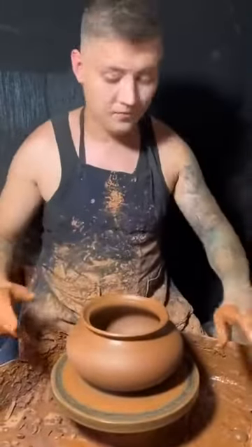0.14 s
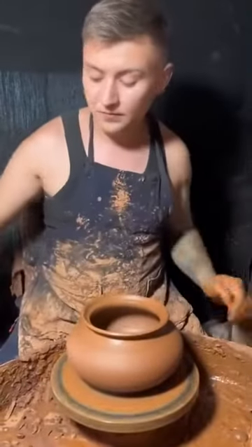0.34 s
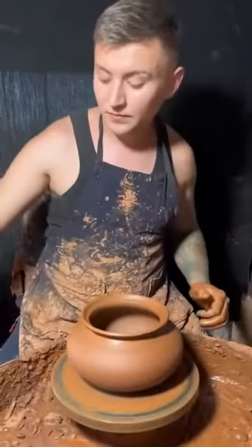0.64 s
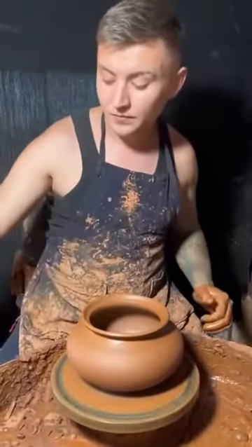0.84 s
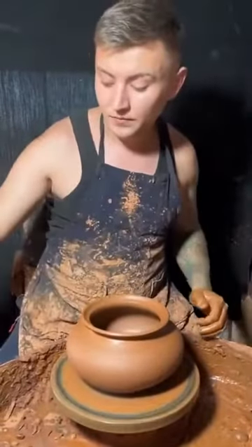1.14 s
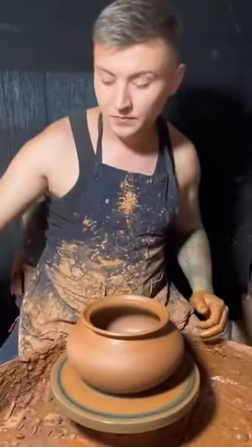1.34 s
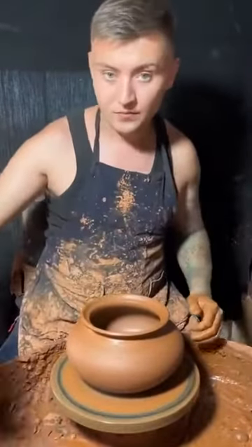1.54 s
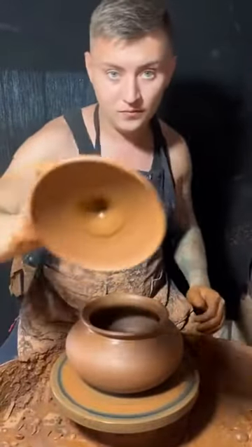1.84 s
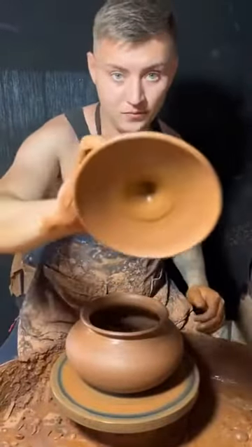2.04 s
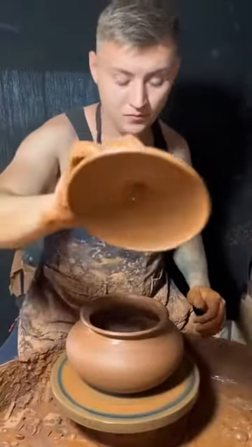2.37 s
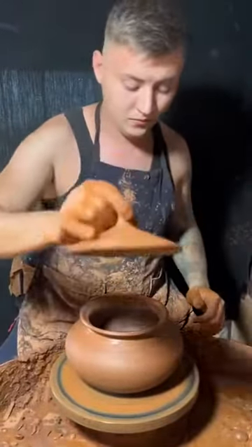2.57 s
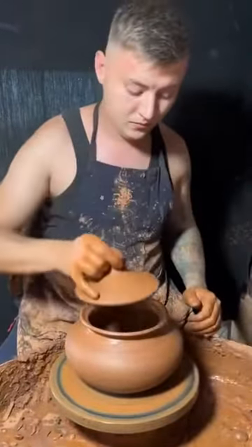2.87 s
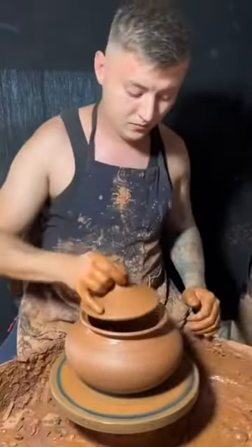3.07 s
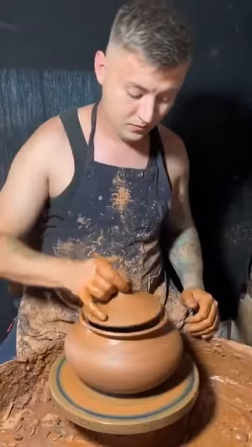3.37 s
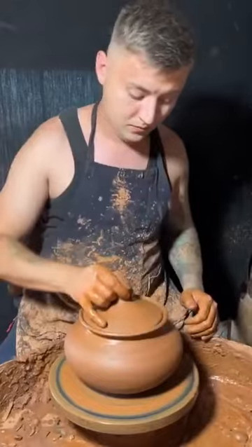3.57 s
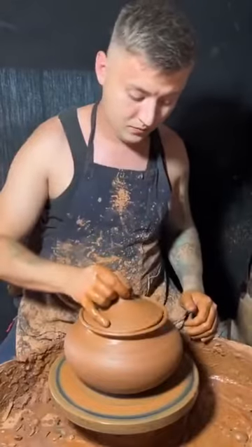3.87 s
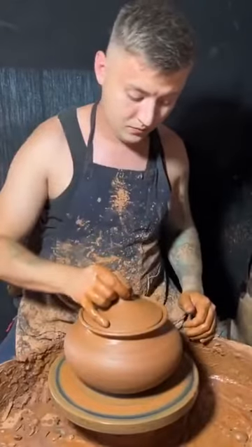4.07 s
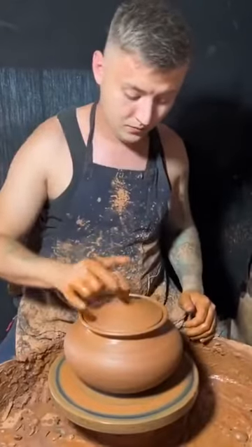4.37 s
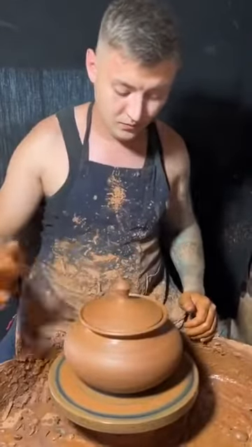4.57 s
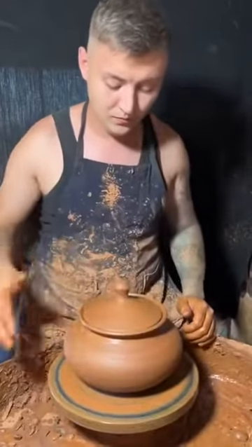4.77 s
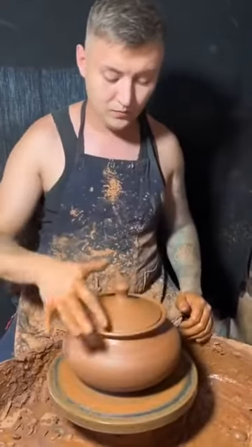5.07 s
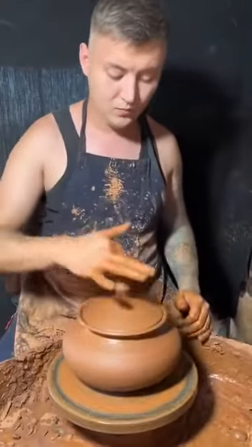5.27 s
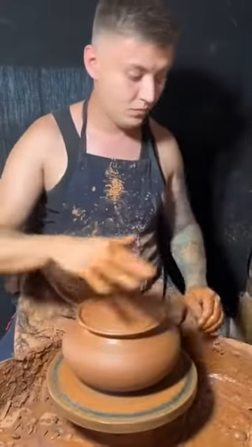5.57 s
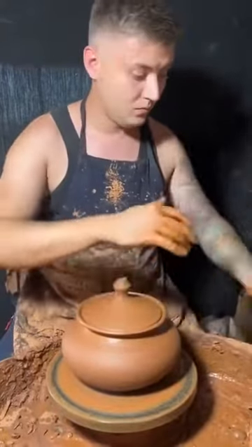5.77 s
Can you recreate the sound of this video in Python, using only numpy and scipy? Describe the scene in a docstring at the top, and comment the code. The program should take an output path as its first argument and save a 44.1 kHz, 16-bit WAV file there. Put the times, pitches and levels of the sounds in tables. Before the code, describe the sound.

Low, dull machine noise throughout, with a motor whine and gently throbbing frame. Opening rumble fades after dull knocks; a brief low-toned rush of air sweeps close by. After a calmer stretch the clay lid is released with two soft heavy thuds, followed by half a second of quick stick-slip rasping, thin metal singing, a tiny squeak and a short scrape as the rumble grows. Close indoor pickup, faint intermittent hiss.

```python
"""A small workshop where a potter's wheel turns: wavering motor tones over noise of the bearings.
Throbbing rumble of the frame dies away after the start and swells again with low drones near the end, with
dull low knocks. A fluttering whoosh of shaped noise round a low note passes as a clay lid is held up; the lid
is let go with a double thud. Wavering modes of metal ring faintly, stick-slip noise strokes chatter for half
a second, rising sines squeak, gritty noise bursts scrape, and thin hiss comes and goes."""
import sys
import numpy as np
from scipy import signal
from scipy.fft import rfft, irfft
from scipy.io import wavfile

SR = 44100
rng = np.random.default_rng(int(sys.argv[2]) if len(sys.argv) > 2 else 0)


def store_wav(level_fs):
    """Save 16-bit WAV to argv[1]."""
    pcm = np.round(np.clip(np.atleast_2d(level_fs), -1, 1) * 32767)
    wavfile.write(sys.argv[1], SR, pcm.T.astype(np.int16))


N = 260631
TIME = np.arange(N) / SR
FREQS = np.fft.rfftfreq(N, 1 / SR)

# port level difference: (frequency [Hz], left minus right [dB])
PORT_LEAN = [(60, 0), (110, -.7), (200, -2), (380, -2.7), (680, -6), (1000, -1.8), (2400, -1.4),
             (4400, -.7), (8000, 0)]
# port phase difference: (frequency [Hz], lead of left [rad])
PORT_LEAD = [(430, 0), (660, 1), (1030, 0)]


def amp(db):
    """Decibels to gain."""
    return 10 ** (np.asarray(db) / 20)


def unit(x):
    """Scale to an rms of one."""
    return x / np.sqrt(np.mean(abs(x) ** 2) + 1e-20)


def read(points):
    """Table over frequency, interpolated on a log axis."""
    hz, value = np.transpose(points)
    return np.interp(np.log(FREQS + 1), np.log(hz + 1), value)


def level(rows):
    """Curve of (time [s], level [dB]) as a gain."""
    return amp(np.interp(TIME, *np.transpose(rows)))


def resonances(modes):
    """Gain over frequency of steep-sided resonances, their powers added."""
    power = sum(amp(2 * db) / (1 + ((FREQS - hz) / width_hz) ** 2) ** 2 for hz, width_hz, db in modes)
    return np.sqrt(power)


def uneven_colour(depth_db, spacing_hz):
    """Random uneven colour: some pitches raised, neighbours sunk."""
    knots_hz = np.arange(0, FREQS[-1], spacing_hz)
    ripple = np.interp(FREQS, knots_hz, rng.standard_normal(len(knots_hz)))
    return amp(depth_db * ripple * FREQS / (FREQS + 500))  # shallower in the bass


def ports(near, apart):
    """Two unrelated spectra become a left and right microphone signal, partly alike."""
    # correlation of the ports: (frequency [Hz], likeness [0-1])
    likeness = [(30, .98), (60, .988), (130, 0.98), (290, 0.9), (640, 0.56), (1000, 0.85), (1500, 1),
                (2800, 0.96), (4300, .68), (5400, 0.85), (7000, 0.96), (9500, 0.93), (12000, 0.81),
                (15000, .85)]
    alike = np.clip(read(likeness), 0, 1)
    shared = np.sqrt((1 + alike) / 2) * near
    own = np.sqrt((1 - alike) / 2) * apart
    tilt = amp(read(PORT_LEAN) / 2) * np.exp(.5j * read(PORT_LEAD))
    return unit(irfft(np.array([(shared + own) * tilt, (shared - own) / tilt]), N))


def noise(gain):
    """Stereo noise of rms one, following a given gain over frequency, with uneven colour."""
    z = rng.standard_normal((4, len(FREQS))) * gain * uneven_colour(depth_db=2.8, spacing_hz=22)
    return ports(z[0] + 1j * z[1], z[2] + 1j * z[3])


def drift(rate_hz):
    """Low-passed random wander of rms one."""
    steps_s = np.arange(0, N / SR + 1, 1 / 1000)
    hz = np.fft.rfftfreq(len(steps_s), steps_s[1])
    spectrum = rfft(rng.standard_normal(len(steps_s))) / (1 + (hz / rate_hz) ** 2) ** 1.5
    return unit(np.interp(TIME, steps_s, irfft(spectrum, len(steps_s))))


def tone(hz, waver, rate_hz, sway_hz=0):
    """A sine whose strength, phase and optionally pitch wander, as heard at both ports."""
    waver = np.clip(waver, 0, 1)
    random_part = (drift(rate_hz) + 1j * drift(rate_hz)) / np.sqrt(2)
    wander = unit(np.sqrt(1 - waver ** 2) + waver * random_part)
    sway_turns = np.cumsum(sway_hz * drift(rate_hz)) / SR if sway_hz else 0
    wave = np.sqrt(2) * wander * np.exp(2j * np.pi * (hz * TIME + sway_turns + rng.random()))
    lean_db = np.interp(hz, *np.transpose(PORT_LEAN))
    lead_rad = np.interp(hz, *np.transpose(PORT_LEAD))
    tilt = amp(lean_db / 2) * np.exp(.5j * lead_rad)
    return np.array([wave * tilt, wave / tilt]).real


def stroke(start_s, length_s, rise_s):
    """Envelope of a contact that builds up quickly, holds, and lets go."""
    age_s = np.maximum(TIME - start_s, 0)
    return (1 - np.exp(-age_s / rise_s)) * np.exp(-(age_s / length_s) ** 2)


def arch(crest_s, db, rise_s, fall_s, squareness):
    """A rounded swell round a crest; more squareness gives a flatter top and steeper sides."""
    away = np.maximum((crest_s - TIME) / rise_s, (TIME - crest_s) / fall_s)
    return amp(db) * np.exp(-abs(away) ** squareness)


def wheel(running_db=-31.5, sway_db=0.61, mains_sway_db=1.5, whine_sway_db=1.2):
    """Bearing noise under the motor's wavering hum, 50 Hz bass and stronger whine."""
    # bearing noise colour: (frequency [Hz], relative density [dB])
    bearing_colour = [(20, -19), (45, -3.5), (135, 3.5), (170, -1.5), (305, -2.5), (390, -9), (520, -8),
                      (620, -4), (720, -15.5), (1000, -21.7), (1300, -20), (2100, -23.2), (3200, -32),
                      (5300, -35), (7600, -50), (9500, -63), (15000, -76)]
    # low motor tones: (frequency [Hz], level [dB], waver [0-1])
    hum_tones = [(96.8, -43.5, 0.74), (133.7, -41.5, .8), (205, -42.5, 0.62), (305, -43.5, 0.63),
                 (371, -57, 0.8), (533, -52, 0.2), (592, -49.5, 0.6)]
    # bass hum: (time [s], level [dB])
    mains_curve = [(0.0, -39), (0.8, -43), (1.55, -35.5), (2.55, -46), (3.15, -39), (3.8, -45), (4.5, -39),
                   (5.9, -37.5)]
    # one sink of the whine: (centre [s], half-length [s], change [dB])
    whine_dip = (4.93, 0.3, -7)

    bearing = amp(running_db + sway_db * drift(7.3)) * noise(amp(read(bearing_colour)))
    hum = sum(amp(db) * tone(hz, waver, rate_hz=12.2) for hz, db, waver in hum_tones)
    mains = level(mains_curve) * amp(mains_sway_db * drift(4)) * tone(50, waver=0.19, rate_hz=4)
    dip_s, half_s, dip_db = whine_dip
    whine_db = -41 + whine_sway_db * drift(5) + dip_db * np.exp(-((TIME - dip_s) / half_s) ** 2)
    whine = amp(whine_db) * tone(634, waver=.2, rate_hz=9.3)
    return bearing + hum + mains + whine


def drive(turn_s=0.495, turn_db=2.6):
    """Thin tones of the drive, each swelling at its own point of every turn."""
    # drive tones: (frequency [Hz], mid level [dB], waver [0-1], one crest [s])
    drive_tones = [(1018, -64, 0.7, .25), (1088, -63.5, .8, .2), (1133, -57.7, 0.9, .23),
                   (1222, -58.3, 0.92, .28), (1250, -60, .92, .34), (1308, -62, .7, .35),
                   (1352, -53.3, 0.42, .41), (1685, -63, .8, .3), (1719, -59.5, 0.7, .2),
                   (1990, -65, .8, .34)]
    # common fade: (time [s], level [dB])
    fade = [(4.1, 0), (4.45, -5)]
    tones = 0
    for hz, db, waver, crest_s in drive_tones:
        swell_db = turn_db * np.cos(2 * np.pi * (TIME - crest_s) / turn_s)
        tones = tones + amp(db + swell_db) * tone(hz, waver, rate_hz=14, sway_hz=5)
    return level(fade) * tones


def rumble(throb_hz=10.2, throb_crest_s=5.375, throb_db=1.5, flutter_db=0.9):
    """The frame's opening rumble dies away; near the end it swells again with drones; a throb runs throughout."""
    # linear swells: (start [s], crest [s], end [s], crest level [dB])
    swells = [(-1.2, 0.2, 0.95, -25.3), (4.28, 5.65, 9, -20.2)]
    # frame and pan resonances: (centre [Hz], half-width [Hz], relative level [dB])
    frame_modes = [(170, 40, -8), (205, 17.3, -5), (281.6, 19.6, 0), (297, 120, -3), (378, 14, -4.5),
                   (420, 8, -6.5), (480, 44, -12), (629, 32, -18)]
    # deep resonances: (centre [Hz], half-width [Hz], relative level [dB])
    deep_modes = [(56, 33, -15), (87.4, 20, -5.5), (142.4, 13.5, 0.5), (186.4, 11.7, -2.5)]
    # drone notes: (frequency [Hz], crest [s], level [dB], rise [s], fall [s], waver [0-1])
    drone_notes = [(144, 5.8, -32, .7, .6, .6), (209.5, 4.9, -33, .5, .7, .35),
                   (276, 5.62, -27, .5, .5, .45), (415, 5.53, -32, .22, .16, .3)]

    shake = sum(np.interp(TIME, [start_s, crest_s, end_s], [0, amp(db), 0])
                for start_s, crest_s, end_s, db in swells)
    deep = amp(-31) * np.sqrt(shake / amp(-28))  # half the swell in dB; -31 dB when shake is -28 dB
    drone = sum(arch(crest_s, db, rise_s, fall_s, squareness=2.5) * tone(hz, waver, rate_hz=9)
                for hz, crest_s, db, rise_s, fall_s, waver in drone_notes)
    beat_db = throb_db * np.cos(2 * np.pi * throb_hz * (TIME - throb_crest_s))
    throb = unit(amp(beat_db + flutter_db * drift(20)))
    return throb * (shake * noise(resonances(frame_modes)) + deep * noise(resonances(deep_modes)) + drone)


def bumps():
    """Dull knocks through the wheel's frame: some a clear low note, some a rough puff."""
    # knocks: (start [s], level [dB], length [s], centre [Hz], wander rate [Hz], roughness [0-1])
    knocks = [(0.08, -29, 0.2, 120, 60, 0.9), (0.533, -21, 0.058, 146, 25, 0.3),
              (0.615, -24, 0.055, 140, 25, 0.3), (0.8, -27, 0.085, 92, 20, 0.4),
              (3.76, -31, 0.2, 92, 15, 0.6), (4.275, -22.5, 0.06, 128, 40, 0.45),
              (4.27, -32, 0.1, 300, 180, 1), (4.333, -18.5, 0.05, 125, 30, 0.35),
              (4.325, -25.5, 0.14, 200, 140, 1), (4.375, -31.5, 0.08, 440, 75, 1),
              (4.372, -42.5, 0.12, 740, 70, 1), (5.355, -22, .04, 140, 30, .3)]
    return sum(amp(db) * stroke(start_s, length_s, rise_s=0.012) * tone(hz, rough, rate_hz)
               for start_s, db, length_s, hz, rate_hz, rough in knocks)


def whoosh(hoot_hz=286, under_db=-10, ring_db=-6, flutter_db=1.8):
    """A fluttering rush of air with a hollow low note in it, and a weaker one an octave below."""
    # noise colours: (frequency [Hz], relative level [dB])
    body_colour = [(110, -31), (150, 1), (200, -3.5), (400, 0), (560, -4), (800, -11), (1000, -8.5),
                   (1300, -16.5), (1900, -17), (2600, -30), (4000, -54), (9000, -90)]
    air_colour = [(1500, -20), (2400, 5), (3500, 1), (5200, -2), (7000, -9), (12000, -24), (16000, -36)]
    # hollow resonances: (centre [Hz], half-width [Hz], relative level [dB])
    ring_modes = [(420, 50, 3), (560, 50, 2), (860, 50, -2), (996, 45, 0), (1480, 45, -9), (1860, 45, -10)]
    # swells, the tail in the room: (crest [s], level [dB], rise [s], fall [s])
    hoot_arch = (2.122, -24.5, 0.102, 0.105)
    body_arch = (2.147, -25, 0.092, 0.098)
    tail_arch = (2.22, -43, 0.04, 0.07)
    air_arch = (2.132, -41, 0.1, 0.085)

    octave_below = amp(under_db) * tone(hoot_hz / 2, waver=0.71, rate_hz=10)
    hoot = arch(*hoot_arch, squareness=4.5) * (tone(hoot_hz, waver=0.45, rate_hz=35) + octave_below)
    hollow = noise(amp(read(body_colour))) + amp(ring_db) * noise(resonances(ring_modes))
    body = (arch(*body_arch, squareness=1.7) + arch(*tail_arch, squareness=1)) * hollow
    air = arch(*air_arch, squareness=1.4) * noise(amp(read(air_colour)))
    return hoot + unit(amp(flutter_db * drift(220))) * (body + air)


def metal(rough=0.3, sway_hz=8):
    """Lightly rubbed metal sings in unrelated, wavering modes, each catching and letting go in its own time."""
    # mode swells: (frequency [Hz], crest [s], level of the clear tone [dB], rise [s], fall [s])
    mode_swells = [(1147, 4.52, -48.7, 0.18, 0.16), (1147, 5.08, -49.2, 0.38, 0.35),
                   (1674, 4.92, -49.5, 0.57, 0.47), (2126, 4.58, -52, 0.09, 0.08),
                   (2126, 4.86, -50.8, 0.6, 0.64), (2630, 5.1, -58, 0.5, 0.42),
                   (3198, 5.04, -54, 0.32, 0.15), (4177, 4.9, -58.5, 0.3, 0.28)]
    ringing = 0
    for hz, *swell in mode_swells:
        clear = tone(hz, waver=.25, rate_hz=12, sway_hz=sway_hz)
        ringing = ringing + arch(*swell, squareness=4.5) * (clear + rough * tone(hz, waver=1, rate_hz=30))
    return ringing


def chatter(grit_db=1.4, tail_db=-13, tail_s=0.33, uneven_db=1.2, sizzle_s=0.055):
    """Dry, uneven stick-slip strokes, sixteen a second, that leave a short wash in the room."""
    # strokes: (start [s], level [dB], length [s], sizzle relative to stroke [dB])
    strokes = [(4.586, -36.5, 0.043, -15), (4.652, -34.6, 0.041, -9.5), (4.717, -36, 0.043, -11.5),
               (4.775, -36.3, 0.038, -13), (4.836, -39, 0.036, -11), (4.901, -38.7, 0.038, -14),
               (4.965, -36.3, 0.04, -17), (5.027, -40.5, 0.034, -17), (5.088, -39.5, 0.04, -17)]
    # rasp and wash colour: (frequency [Hz], relative level [dB])
    rasp_colour = [(1200, -14), (2000, 3), (2650, 0), (3400, -7), (4250, 2), (4850, -5.5), (5500, -3.5),
                   (6400, -19), (9000, -33), (16000, -51.5)]
    # sizzle on top: (centre [Hz], half-width [Hz], relative level [dB])
    sizzle_modes = [(6750, 400, 3), (7650, 480, 2), (8900, 400, -12), (12300, 910, -19)]

    colour = amp(read(rasp_colour))
    grips = [noise(colour * uneven_colour(depth_db=uneven_db, spacing_hz=300)) for _ in range(3)]
    rasp, wash_power, sizzle = 0, 0, 0
    for k, (start_s, db, length_s, sizzle_db) in enumerate(strokes):
        grip = grips[k % len(grips)]  # successive strokes grip differently
        rasp = rasp + amp(db) * stroke(start_s, length_s, rise_s=0.0055) * grip
        wash_power = wash_power + (amp(db + tail_db) * stroke(start_s, tail_s, rise_s=0.014)) ** 2
        sizzle = sizzle + amp(db + sizzle_db) * stroke(start_s, sizzle_s, rise_s=0.006)
    dry_strokes = (rasp + sizzle * noise(resonances(sizzle_modes))) * amp(grit_db * drift(82))
    return dry_strokes + np.sqrt(wash_power) * noise(colour)


def squeak(edge_db=-42.7, edge_s=0.075, jitter=.02, rise_hz_per_s=4000):
    """A short clear squeak that catches, slips, rises a little and rings on in the room."""
    # catches: (crest [s], peak level [dB], half-length [s], pitch at crest [Hz])
    catches = [(5.3955, -33.5, .0028, 2540), (5.416, -38.3, .016, 2600)]
    # breathy edge and after-ring: (centre [Hz], half-width [Hz], relative level [dB])
    edge_modes = [(2150, 160, -6), (2600, 120, 2), (7000, 600, -16)]
    chirps = 0
    for crest_s, db, half_s, hz in catches:
        glide_hz = rise_hz_per_s * np.clip(TIME - crest_s, -half_s, half_s)
        pitch_hz = (hz + glide_hz) * (1 + jitter * drift(300))
        wave = np.sin(2 * np.pi * np.cumsum(pitch_hz) / SR)
        chirps = chirps + arch(crest_s, db, half_s, half_s, squareness=6) * wave
    edge = amp(edge_db) * stroke(5.392, edge_s, rise_s=0.01) * noise(resonances(edge_modes))
    return chirps * amp(2 * drift(150)) + edge


def scrapes(grit_db=1.5, tail_db=-15, tail_s=.2):
    """Short gritty rubs on shared resonances, with a faint room tail; each rub has its own brightness."""
    # rubs: (start [s], level [dB], length [s], brightness from 1 to 5 kHz [dB/octave])
    rub_rows = [(4.36, -48, 0.076, 0), (5.215, -45.5, 0.035, 0), (5.39, -47, 0.07, 7),
                (5.579, -33.3, 0.052, 0.7)]
    # shared resonances: (centre [Hz], half-width [Hz], relative level [dB])
    rub_modes = [(1250, 90, 1), (1300, 400, -6), (2010, 260, 2), (3100, 950, -7.5), (5200, 500, -14)]
    octaves = np.log2(np.clip(FREQS, 1000, 5000) / 1000)
    rubs = 0
    for start_s, db, length_s, bright_db in rub_rows:
        tail = amp(tail_db) * stroke(start_s, tail_s, rise_s=.02)
        envelope = np.hypot(stroke(start_s, length_s, rise_s=0.004), tail)
        rubs = rubs + amp(db) * envelope * noise(resonances(rub_modes) * amp(bright_db * octaves))
    return rubs * amp(grit_db * drift(60))


def hiss(floor_db=-72, trim_db=1):
    """A thin top hiss that comes and goes: each spell rises, holds and fades."""
    # spells: (start [s], end [s], level before trim [dB], rise [s], fall [s])
    spells = [(-0.03, 0.28, -53, 0.16, 0.06), (0.3, 1.4, -62.5, 0.05, 0.05),
              (1.39, 2.22, -57.5, 0.025, 0.05), (2.85, 3.785, -57.2, 0.07, 0.045),
              (4.23, 5.4, -58, 0.22, 0.17)]
    # hiss colour: (frequency [Hz], relative level [dB])
    hiss_colour = [(4000, -40), (6300, 12), (7500, 11.5), (9200, 10), (10600, 2), (12300, 8.5), (13500, 3),
                   (14500, 2), (16000, 3)]
    power = amp(floor_db) ** 2  # before trim
    for start_s, end_s, db, rise_s, fall_s in spells:
        onset = 1 - np.exp(-np.maximum(TIME - start_s, 0) / rise_s)
        fade = np.exp(-np.maximum(TIME - end_s, 0) / fall_s)
        power = power + (amp(db) * onset * fade) ** 2
    return amp(trim_db) * np.sqrt(power) * noise(amp(read(hiss_colour)))


def scene():
    """All sources at the two ports."""
    machine = wheel() + drive() + rumble() + bumps()
    return machine + whoosh() + metal() + chatter() + squeak() + scrapes() + hiss()


def record(dry, low_cut_hz=34, edge_hz=15700):
    """The microphone's bass roll-off, two narrow gaps in the treble, then the band limit."""
    # treble gaps: (centre [Hz], half-width [Hz])
    notches = [(5980, 280), (13520, 270)]
    thinned = signal.sosfilt(signal.butter(3, low_cut_hz, "high", fs=SR, output="sos"), dry)
    gaps = 1 - sum(np.exp(-((FREQS - hz) / width_hz) ** 6) for hz, width_hz in notches)
    gapped = irfft(rfft(thinned * signal.windows.tukey(N, .001)) * gaps, N)
    band_limit = signal.firwin(1023, edge_hz, window=("kaiser", 9), fs=SR)
    return signal.oaconvolve(gapped, band_limit[None], "same")


dry = scene()
out = record(dry)
store_wav(out)
```